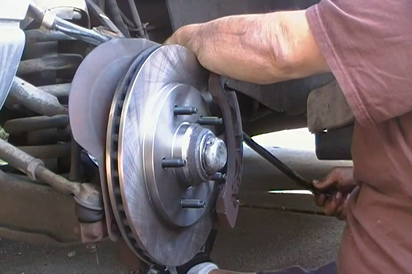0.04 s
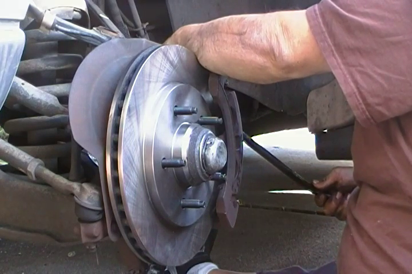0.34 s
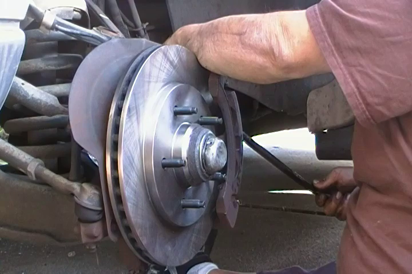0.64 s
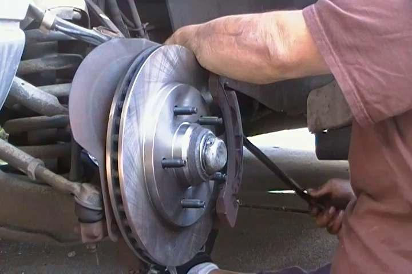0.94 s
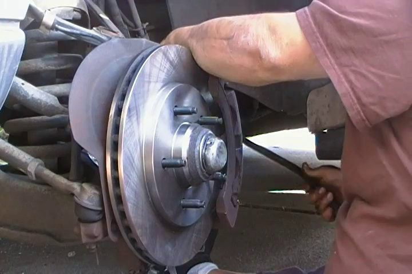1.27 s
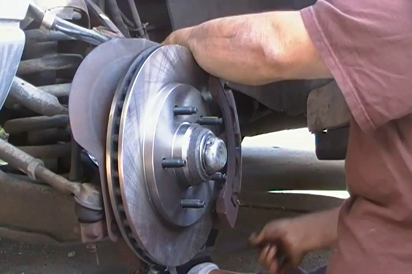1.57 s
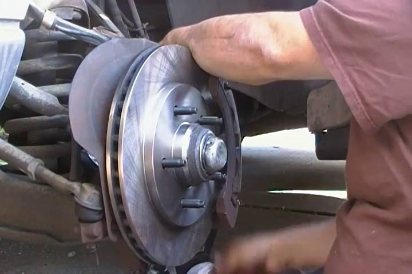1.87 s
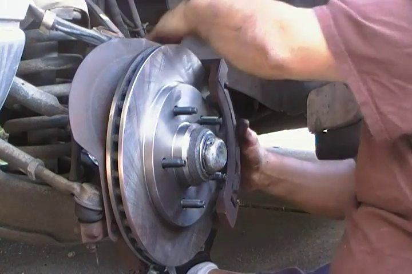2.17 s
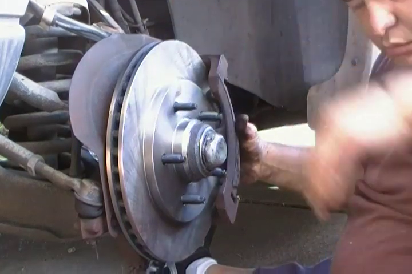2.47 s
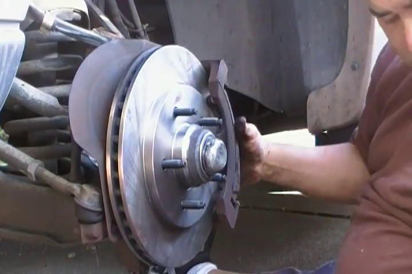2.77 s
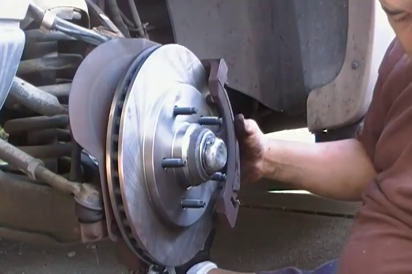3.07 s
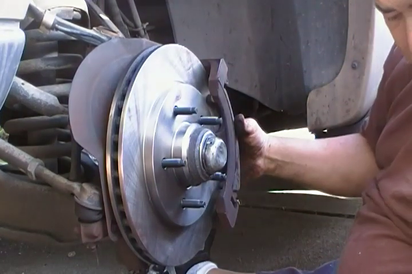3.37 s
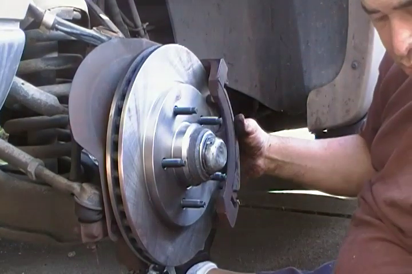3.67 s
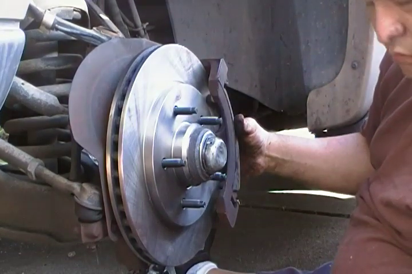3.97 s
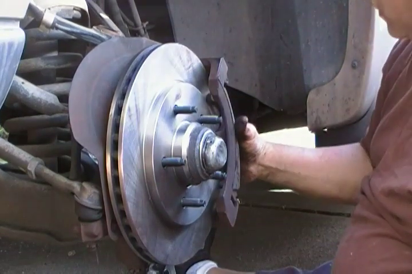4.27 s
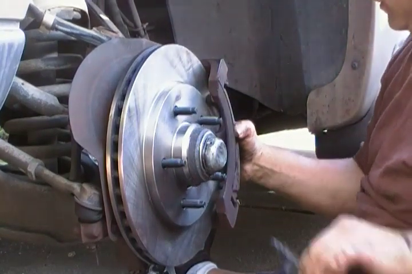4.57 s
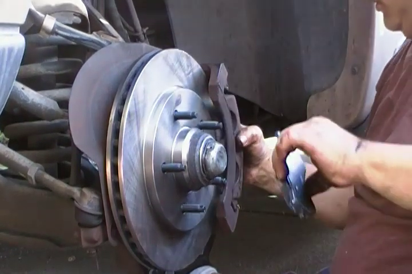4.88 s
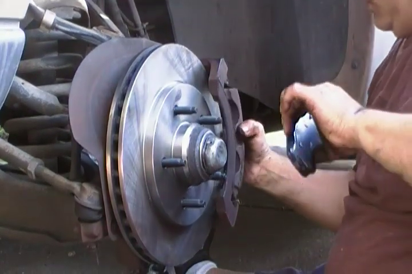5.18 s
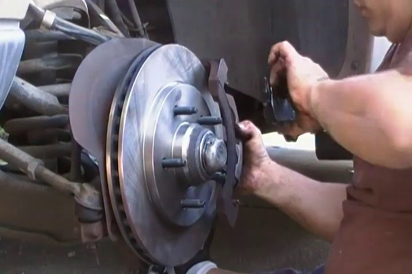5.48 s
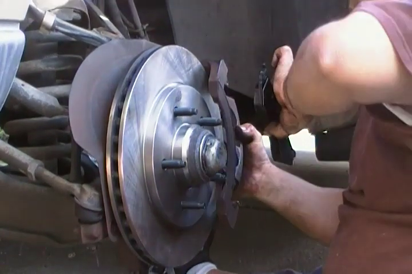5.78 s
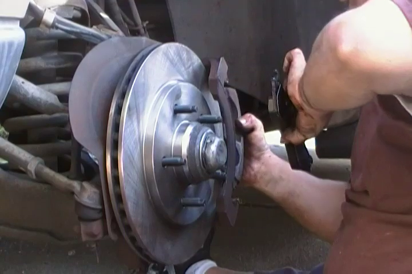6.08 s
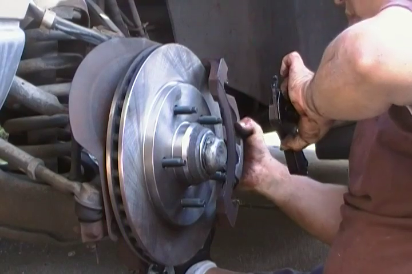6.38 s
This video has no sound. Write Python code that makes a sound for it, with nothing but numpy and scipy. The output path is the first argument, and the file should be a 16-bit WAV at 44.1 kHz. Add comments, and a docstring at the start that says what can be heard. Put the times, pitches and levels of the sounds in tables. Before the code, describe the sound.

A metal bar drops with a loud, bright ring, followed by a hollow knock and light handling of brake parts.

```python
"""A garage, during work on a front brake. A steel pry bar clinks free, drops on the concrete, bounces
and rolls: every blow clacks and rings its bending modes, and grit crunches under it. The caliper bracket
knocks on the disc and booms in the wheel arch; a pad ticks, rasps and squeaks in the hand.
Behind it sit a low room hum, a late thin hiss and a far bird. A limiter flattens the bar's loud ring."""
import sys
import numpy as np
from scipy import signal
from scipy.fft import rfft, irfft, next_fast_len
from scipy.io import wavfile
from scipy.ndimage import uniform_filter1d, map_coordinates

SR = 44100
rng = np.random.default_rng(int(sys.argv[2]) if len(sys.argv) > 2 else 0)


def wrap_up_sound(samples):
    """Save the sound to the file named by the first command line argument, as 16-bit audio."""
    columns = np.atleast_2d(samples).T
    # keep every value between -1 and 1, then stretch to whole-number steps
    tamed = np.clip(columns, -1, 1)
    steps = np.round(tamed * 32767).astype(np.int16)
    wavfile.write(sys.argv[1], SR, steps)


N = 283563
TIME = np.arange(N) / SR

# Tone of the room hum and of the hiss. Each row: frequency in Hz, level in dB.
HUM_EQ = [(15, -33.5), (25, -0.5), (81, -3.5), (111, -8), (141, -7), (300, -14), (333, -14.5), (370, -14),
          (520, -17), (925, -16.5), (2370, -29), (4560, -34), (6410, -37), (11100, -37), (13000, -57)]
HISS_EQ = [(2000, -28), (3300, -5), (4300, -5), (4600, -3), (4850, 0.5), (5150, -9), (5800, -10.5),
           (8000, -13.5), (10700, -14.5), (12500, -16.5)]
# Stereo image of the background and of the hits. Each row: frequency in Hz, left-right likeness (1 is mono).
BED_LIKENESS = [(60, 0.31), (100, 1), (180, 0.98), (300, 0.98), (520, 0.94), (880, 0.85), (1510, 0.63),
                (2590, 0.22), (4430, 0.29), (7580, 0.022), (13000, 0.3)]
HIT_LIKENESS = [(200, 1), (1000, 0.94), (2800, 0.5), (5000, 0.445), (11000, 0.87)]
# The garage's reverb. Each row: frequency in Hz, t60 in seconds.
ROOM_T60 = [(150, 0.64), (400, 0.42), (1200, 0.21), (3000, 0.12), (10000, 0.048)]
# Bird calls. Each row: start in seconds, length in seconds, level in dB, top pitch in Hz.
CHIRPS = [(2.865, 0.058, -60.5, 4360), (3.076, .11, -62.5, 4250), (5.37, 0.07, -59.5, 3910)]
# Ticks of pad and clips. Each row: start in seconds, level in dB, centre in Hz, t60 in seconds.
TICKS = [(1.203, -48, 8060, 0.042), (3.126, -43, 3760, 0.03), (3.152, -53, 2970, 0.055),
         (4.104, -46, 3680, 0.057), (4.152, -50, 8100, 0.018), (4.273, -47, 4050, 0.055),
         (4.9171, -36, 9500, 0.023), (4.963, -37.5, 2850, 0.033), (5.148, -39.5, 5100, 0.037),
         (5.46, -53, 4100, .015)]
# Hand and pad shifting on the bracket.
# Each row: start in seconds, length in seconds, level in dB, brightness in dB per octave.
RASPS = [(1.159, 0.064, -50.5, 3.5), (3.726, .035, -52, 2.5), (3.793, .065, -47, -1), (4.045, 0.11, -61, 6),
         (4.236, 0.076, -57.5, 12), (4.767, 0.22, -59.5, 14)]
# Tone of that rubbing. Each row: frequency in Hz, level in dB.
RASP_EQ = [(900, -20), (1500, -1.5), (2700, 1), (3400, -13.5), (8000, -18), (13000, -38)]
# Stick-slip squeaks.
# Each row: start in seconds, length in seconds, level in dB, pitch in Hz, step per overtone in dB.
SQUEAKS = [(4.94, 0.026, -34.5, 3494, -7.5), (5.145, 0.0143, -33, 4050, -9), (5.154, .026, -43, 4160, -11),
           (6.246, 0.0086, -28.5, 1073, -28), (6.257, 0.025, -27, 1200, -45)]
# Bracket knocks. Each row: start in seconds, thud level in dB, hardness as a slope in dB per octave.
KNOCKS = [(1.204, -27.5, -2), (1.222, -27.5, -2), (2.4027, -17.5, .5), (5.2733, -25.5, 3),
          (5.482, -38.5, 1.5), (5.504, -37.5, 2.5), (5.649, -37, 3), (5.888, -43.5, 2),
          (6.247, -28.5, -4.5)]
# Modes of the bracket on the disc, and of the air in the wheel arch.
# Each row: frequency in Hz, level in dB, t60 in seconds.
BRACKET_MODES = [(630, -3.5, 0.15), (752, -10, 0.36), (883, -8.5, 0.21), (1085, -3, 0.49),
                 (1195, -1.5, 0.09), (1353, -10, 0.13), (1440, -14.5, 0.53), (1850, -21, 0.26),
                 (2461, 7, .24), (4059, -5, 0.129), (5580, -20, 0.095), (7540, -17, 0.11)]
ARCH_MODES = [(196.2, -8.5, 0.19), (277.5, -12, 0.39), (320, 1, 0.22), (380, -16.5, 1.25),
              (506.7, -5.5, 0.15), (630, -6.5, 0.1)]
# Tone of the bracket's thud, the arch's boom and the floor's grit. Each row: frequency in Hz, level in dB.
THUD_EQ = [(150, -23), (300, -9), (600, -5.5), (900, 1.5), (1300, -2.5), (1750, -8.5), (2100, -9),
           (2800, -16.5), (5000, -21), (9000, -36.5), (12500, -44)]
BOOM_EQ = [(30, -4), (80, 4), (170, 3), (250, -3), (320, 13), (420, 8), (600, -14), (1100, -39),
           (1800, -49), (5000, -50)]
GRIT_EQ = [(150, -8), (520, -3), (900, -3.5), (1500, -4), (3200, 0.5), (4300, -4), (7000, -4),
           (10000, -10.5), (13000, -23)]
# The bar's bending modes, in close pairs. Each row: frequency in Hz, three levels in dB (struck on
# the tip, flat, on the heel), t60 in seconds, left over right in dB.
BAR_MODES = [(1017, -18, -22, -23, .18, 0), (1145, -29, -31, -13, .5, -3), (1852, -19, -8, -19, .19, 0),
             (2049, -19, -1.5, -4, .36, 0), (2530, -29, -24, -18, .34, 0), (2986, -12, -7, -15, .42, 0),
             (3055, -8.5, -22, -10, .27, 2), (3911, -28, -6, -14, .5, 1), (4005, -24, -23, 2, .28, 2),
             (5297, -21, -3, -10, .45, -6), (5346, -22, -16.5, -12, .55, -3), (6087, -23, -5, -19, .33, 3),
             (6345, -17, -28, -16, .42, 2), (6985, -17, -7, -7, .3, 0), (7030, -19, -15, -9, .62, 0),
             (8652, -11, 1.5, -18, .31, 10), (8818, -21, -20, -16, .82, 4), (9661, -13, -1.5, -8, .44, 3),
             (10500, -27, -11.5, -24, .72, 2), (10650, -14, -5.5, -17, .36, 5),
             (11870, -30, -26, -23, .66, 3), (12000, -19, -15, -23, .4, 4), (12125, -31, -25, -24, .66, 3)]
# Blows on the bar. Each row: start in seconds, ring level in dB, place (0 tip, 1 flat, 2 heel),
# clack level in dB, contact resonance in Hz.
BAR_BLOWS = [(1.354, -20.5, 0.4, -14, 3020), (1.8751, 3, 0.13, .5, 3028), (1.9496, -17.5, 2, -4, 3450),
             (2.1205, -22.5, 0.68, -10.5, 4977), (2.142, 3.5, 0.85, 1.5, 6875),
             (2.156, 0.5, 0.57, -11, 1950), (2.211, -5, 1, -31, 3000), (2.25, -6, 0.74, -25.5, 4400),
             (2.281, -9.5, 0.92, -26.5, 3160)]

LET_GO_S, REST_S, SETTLE_S = 1.93, 2.358, 0.078  # the bar leaves the hand, comes to rest, takes to settle


def amp(db):
    """Turns dB into gain."""
    return 10 ** (np.asarray(db) / 20)


def unit(x):
    """Scales to rms 1."""
    return x / np.sqrt(np.mean(x ** 2) + 1e-20)


def read(points, hz):
    """Reads a curve on a log-frequency axis."""
    f, value = np.transpose(points)
    return np.interp(np.log(hz + 1), np.log(f + 1), value)


def add(mix, s, sound):
    """Mixes a sound in at s seconds."""
    part = mix[:, max(round(s * SR), 0):][:, :sound.shape[-1]]
    part += sound[..., :part.shape[1]]


def ramp(t, start, length):
    """A straight fade from 0 to 1."""
    return np.clip((t - start) / length, 0, 1)


def noise(colour, size, likeness=HIT_LIKENESS):
    """Stereo noise of rms 1; colour gives dB for each frequency."""
    length = next_fast_len(size)
    hz = np.fft.rfftfreq(length, 1 / SR)
    left, other = rfft(rng.standard_normal((2, length)))
    same = np.clip(read(likeness, hz), -1, 1)
    right = same * left + np.sqrt(1 - same ** 2) * other
    return unit(irfft(np.array([left, right]) * amp(colour(hz)), length)[:, :size])


def drift(size, per_s):
    """A smooth random wobble of rms about 1."""
    coarse = TIME[:size:16]
    wobble = map_coordinates(rng.standard_normal(2048), [coarse * per_s], order=2, mode="wrap")
    return np.interp(TIME[:size], coarse, wobble)


def strike(t, rise, t60):
    """A percussive envelope peaking at 1; times in seconds."""
    shape = (1 - np.exp(-t / rise)) * np.exp(-np.log(1000) * t / t60)
    return shape / shape.max()


def modes(table, t, rise):
    """A struck body's ring: one dying sine per mode."""
    return sum(amp(db) * np.sin(2 * np.pi * (hz * t + rng.random())) * strike(t, rise, t60)
               for hz, db, t60 in table)


def room(x, wet_db, gap_s):
    """Adds garage reflections: sparse taps of random sign, the treble dying first."""
    t = TIME[:SR // 2]
    taps = rng.choice([-1., 1.], (2, len(t))) * (rng.random((2, len(t))) < .06) * (t > gap_s)
    hz, frame_s, bands = signal.stft(taps + 0.39 * taps[::-1], SR, nperseg=256)
    decay = np.exp(-np.log(1000) * frame_s / read(ROOM_T60, hz)[:, None])
    tail = signal.istft(bands * decay, SR, nperseg=256)[1]
    return x + amp(wet_db) * signal.fftconvolve(x, tail / np.linalg.norm(tail[0]), axes=1)[:, :N]


def room_tone(hum_db=-48, swell_db=.7, hiss_db=-60):
    """The garage's low hum, gently wavering, and a thin hiss that fades in and stays."""
    hum_gain = amp(hum_db + swell_db * drift(N, per_s=5.3))
    hum = hum_gain * noise(lambda f: read(HUM_EQ, f), N, BED_LIKENESS)
    hiss_gain = amp(hiss_db) * ramp(TIME, start=3.36, length=0.92)
    return hum + hiss_gain * noise(lambda f: read(HISS_EQ, f), N, BED_LIKENESS)


def far_bird(top_at=0.73, bend=.42):
    """Faint whistles from outdoors, each arching up to its top pitch and easing off."""
    out = np.zeros((2, N))
    for s, length, db, top_hz in CHIRPS:
        progress = np.linspace(0, 1, int(length * SR))
        hz = top_hz * (1 - bend * (progress - top_at) ** 2)
        add(out, s, amp(db) * np.sin(np.pi * progress) * np.sin(2 * np.pi * np.cumsum(hz) / SR))
    return room(out, wet_db=1.5, gap_s=.01)


def tick(centre_hz, t60, below_db=3.0, above_db=9):
    """A snap of noise, rolling off by so many dB an octave below and above its centre."""
    def colour(hz):
        octaves = np.log2((hz + 1) / centre_hz)
        return np.where(octaves < 0, below_db * octaves, -above_db * octaves)
    return noise(colour, SR // 2) * strike(TIME[:SR // 2], rise=0.036 * t60, t60=t60)


def brake_pad(pitch_sag=.025, pitch_jitter=0.0412, chatter_db=3.0, rasp_rough_db=3):
    """Clips tick, hand and pad rasp; dry steel slipping on steel gives short unsteady squeaks."""
    out = np.zeros((2, N))
    for s, db, hz, t60 in TICKS:
        grain = amp(5.7 * drift(SR // 2, per_s=797))
        add(out, s, amp(db) * grain * tick(hz, t60))
    for s, length, db, slope_db in RASPS:
        size = int(length * SR)
        stroke = signal.windows.tukey(size, .7) * amp(rasp_rough_db * drift(size, per_s=400))
        friction = noise(lambda f: read(RASP_EQ, f) + slope_db * np.log2(1 + f / 1000), size)
        add(out, s, amp(db) * stroke * friction)
    for s, length, db, hz, overtone_db in SQUEAKS:
        size = int(length * SR)
        bend = 1 + pitch_sag * np.linspace(.5, -.5, size) + pitch_jitter * drift(size, per_s=565)
        cycles = np.cumsum(hz * bend) / SR
        tone = sum(amp(overtone_db * k) * np.sin(2 * np.pi * (k + 1) * cycles) for k in range(3))
        envelope = amp(db + chatter_db * drift(size, per_s=446)) * signal.windows.tukey(size, .4)
        add(out, s, envelope * tone)
    return room(out, wet_db=-8.0, gap_s=.006)


def caliper_bracket(wash_db=-5, boom_delay_s=0.00906):
    """A thud, the casting's ring and a hollow boom in the wheel arch; strong, hard knocks ring most."""
    metal, hollow, t = np.zeros((2, N)), np.zeros((2, N)), TIME[:SR // 2]
    for s, thud_db, hardness in KNOCKS:
        ring_db = 6.2 + 1.99 * thud_db + 3.84 * hardness
        boom_db = -17.5 + 0.61 * thud_db + 1.5 * hardness
        thud = noise(lambda f: read(THUD_EQ, f) + hardness * np.log2(f / 1000 + 0.052), len(t))
        add(metal, s, amp(thud_db) * thud * strike(t, rise=0.00027, t60=0.062))
        add(metal, s, amp(ring_db) * modes(BRACKET_MODES, t, rise=0.00076))
        wash = noise(lambda f: read(BOOM_EQ, f), len(t)) * strike(t, rise=0.0071, t60=0.36)
        boom = modes(ARCH_MODES, t, rise=0.015) + amp(wash_db) * wash
        add(hollow, s + boom_delay_s, amp(boom_db) * boom)
    return room(metal, wet_db=-7.0, gap_s=0.0057) + hollow


def contact(f, centre_hz, width_octaves=.13):
    """The resonance of the contact between bar and floor, peaking at 1."""
    return 1 / (1 + (np.log2((f + 1) / centre_hz) / width_octaves) ** 2)


def softness(f, centre_hz, blow_db, db_per_octave=29):
    """A low-pass gain: a longer or weaker contact carries less treble."""
    cutoff_hz = 4.5 * centre_hz * 2 ** (blow_db / db_per_octave)
    return 1 / np.sqrt(1 + (f / cutoff_hz) ** 6)


def rolling_level():
    """Each blow of the loose bar sets it rolling; the motion dies away until it comes to rest."""
    energy = np.zeros((1, N))
    for s, db, *_ in BAR_BLOWS:
        if s > LET_GO_S:
            add(energy, s, (amp(db) * strike(TIME[:SR], rise=0.0022, t60=0.77)) ** 2)
    return np.sqrt(energy[0]) * (1 - ramp(TIME, REST_S - SETTLE_S, SETTLE_S))


def bar_on_concrete(grit_db=-22.5, skirt_db=-23, rough_db=4):
    """Each blow clacks in its contact resonance, and grit crunches under the rolling bar."""
    grit = noise(lambda f: read(GRIT_EQ, f), N) * unit(amp(rough_db * drift(N, per_s=180)))
    out = amp(grit_db) * rolling_level() * grit
    t = TIME[:SR // 2]
    for s, ring_db, _, clack_db, centre_hz in BAR_BLOWS:
        def colour(f):
            skirt = amp(skirt_db + read(GRIT_EQ, f))
            return 20 * np.log10((contact(f, centre_hz) + skirt) * softness(f, centre_hz, ring_db))
        add(out, s, amp(clack_db) * noise(colour, len(t)) * strike(t, rise=0.00055, t60=.055))
    return room(out, wet_db=-13.5, gap_s=.005)


def bar_ring(held_t60=.14, rest_loss_db=7, waver=1.5, sways_per_s=28, rattle=.04, contact_gain=1.67):
    """Blows feed the bar's modes; the hand damps those struck while held, and rolling makes them waver."""
    out, start, t = np.zeros((2, N)), BAR_BLOWS[0][0], TIME[:2 * SR]
    rolling = np.interp(t + start, TIME, rolling_level())
    rolling = np.sqrt(rolling / rolling.max())
    settled = amp(-rest_loss_db * ramp(t + start, REST_S, SETTLE_S))  # the floor takes some of the ring
    for hz, *place_db, t60, pan_db in BAR_MODES:
        energy = np.zeros((1, len(t)))
        for s, db, place, _, centre_hz in BAR_BLOWS:
            strength = amp(db + np.interp(place, [0, 1, 2], place_db))
            coupling = softness(hz, centre_hz, db) * (1 + contact_gain * contact(hz, centre_hz))
            ring_t60 = 1 / (1 / t60 + (s < LET_GO_S) / held_t60)
            add(energy, s - start, (strength * coupling * strike(t, rise=0.00036, t60=ring_t60)) ** 2)
        # as it rolls, left and right hear different sides of the bar, and grit jolts the ring
        level_sway, phase_sway = np.array([[drift(len(t), sways_per_s) for _ in range(2)]
                                           for _ in range(2)])
        width = min(hz / 5000, 1.3)  # higher modes spread wider
        waver_db = waver * rolling * (1.7 * drift(len(t), sways_per_s) + 2.7 * width * level_sway)
        envelope = settled * np.sqrt(energy) * amp(waver_db)
        jolts = rolling * (width * phase_sway + rattle * drift(len(t), per_s=440))
        phase = 2 * np.pi * (hz * t + rng.random()) + jolts
        phase[1] += rng.choice([-1, 1]) * width
        add(out, start, envelope * np.sin(phase) * amp([[pan_db / 2], [-pan_db / 2]]))
    return room(out, wet_db=-8.5, gap_s=0.0014)


def scene():
    """The ringing bar up front, with everything else leaning a touch to the left."""
    lean = amp([[.4], [-.4]])
    return bar_ring() + (bar_on_concrete() + caliper_bracket() + brake_pad() + far_bird() + room_tone()) * lean


def record(dry, threshold_db=-12.5, recovery_db_per_s=110, strength=.88):
    """A limiter that grabs at once and recovers steadily, then clipped peaks and a soft top end."""
    power = uniform_filter1d((dry ** 2).mean(0), size=130)
    power_db = 10 * np.log10(abs(power) + 1e-12)
    fall_db = TIME * recovery_db_per_s
    peak_db = np.maximum.accumulate(power_db + fall_db) - fall_db
    over_db = np.maximum(peak_db - threshold_db, 0)
    limited = dry * amp(-strength * uniform_filter1d(over_db, size=40))
    clipped = np.clip(limited, -.85, .85)
    soft_top = signal.firwin(41, 11900, fs=SR)
    band_limit = signal.firwin(511, 13300, window=("kaiser", 9), fs=SR)
    return signal.oaconvolve(clipped, np.convolve(soft_top, band_limit)[None], "same", axes=1)


dry = scene()
out = record(dry)
wrap_up_sound(out)
```